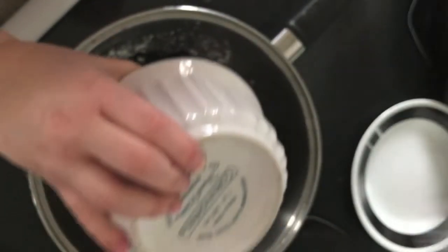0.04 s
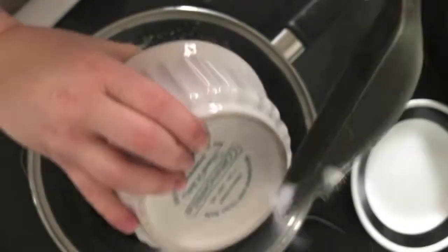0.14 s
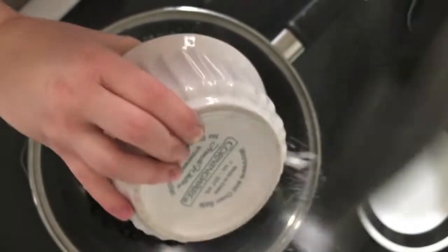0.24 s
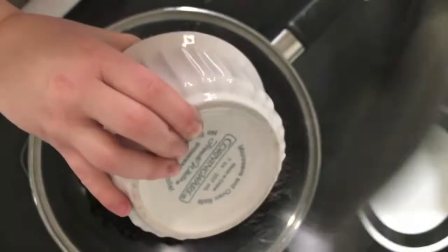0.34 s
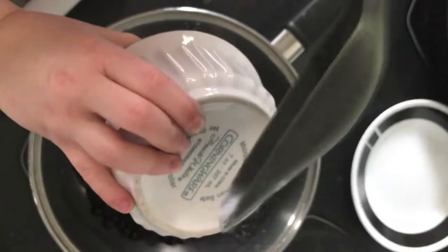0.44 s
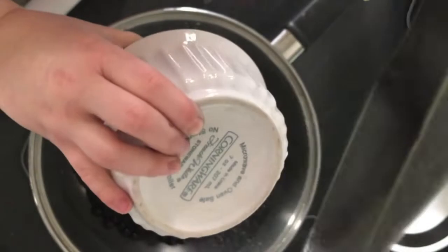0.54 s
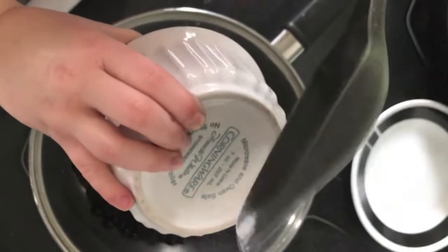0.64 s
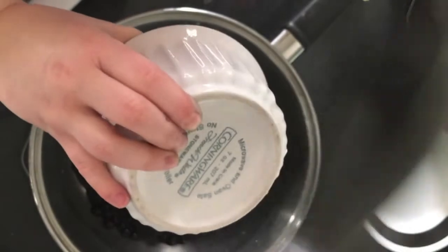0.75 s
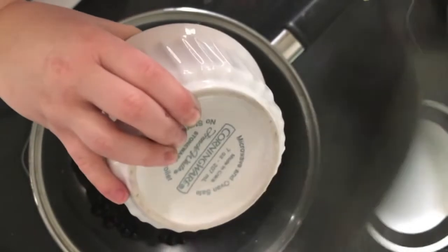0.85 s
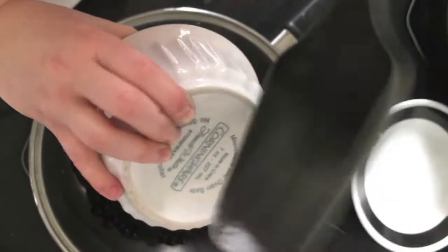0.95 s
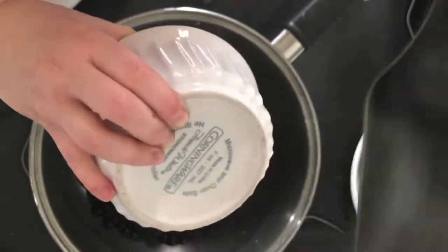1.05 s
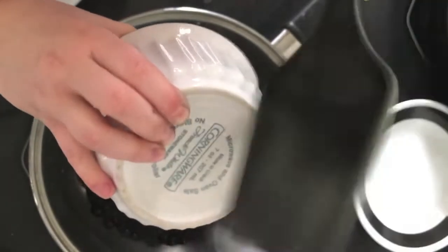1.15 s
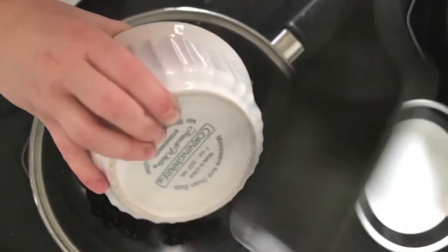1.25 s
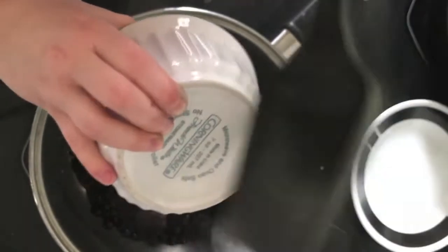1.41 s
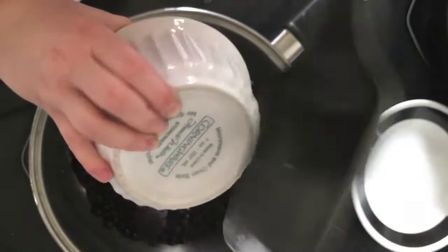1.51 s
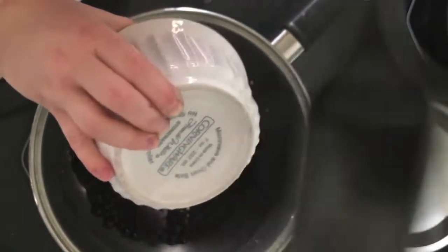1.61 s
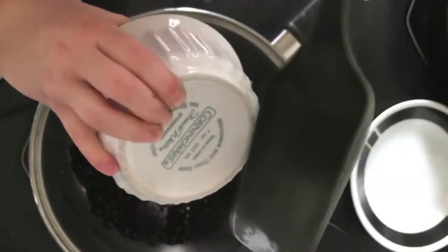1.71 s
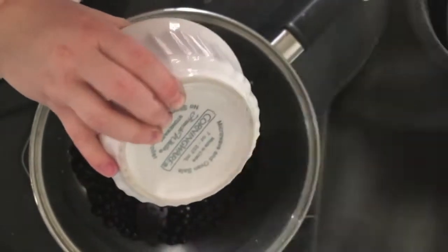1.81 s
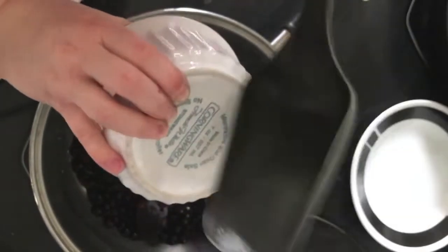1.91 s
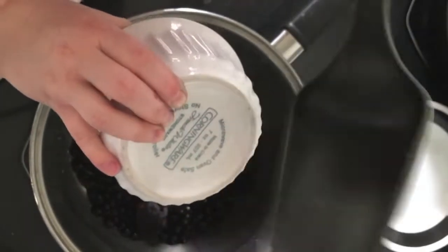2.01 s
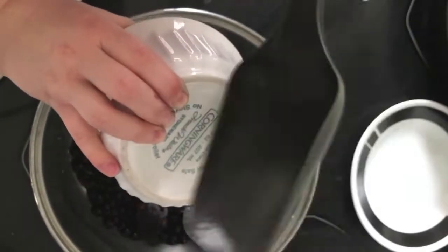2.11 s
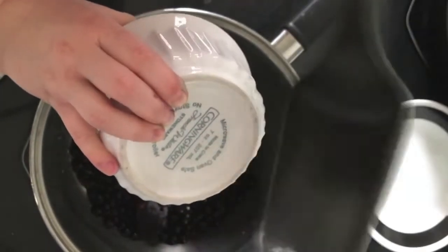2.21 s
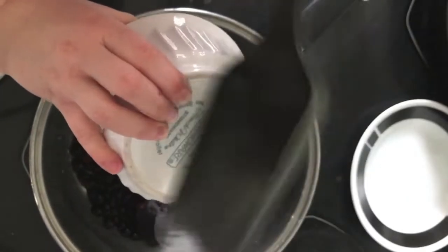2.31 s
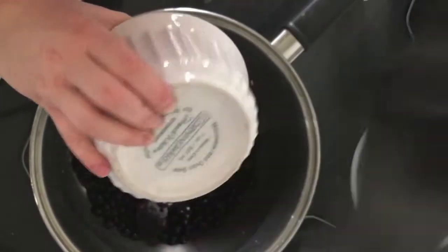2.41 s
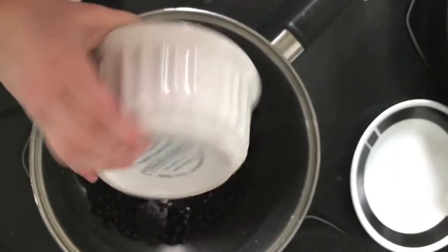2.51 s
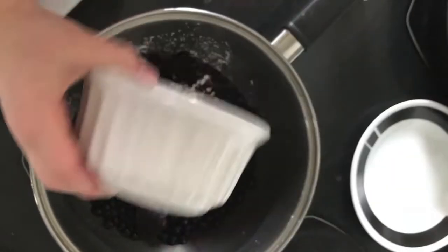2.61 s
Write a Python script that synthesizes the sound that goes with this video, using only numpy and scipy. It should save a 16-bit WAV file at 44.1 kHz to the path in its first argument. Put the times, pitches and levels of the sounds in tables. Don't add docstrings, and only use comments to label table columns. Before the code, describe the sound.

Fingernails tap the base of an upturned ceramic ramekin over a pot, about four bright knocks a second, the first loudest, some with quick bounces. Close microphone in a small kitchen, low hum and slight hiss.

```python
import sys
import numpy as np
from scipy import signal
from scipy.fft import rfft, irfft
from scipy.io import wavfile

SR = 44100
rng = np.random.default_rng(int(sys.argv[2]) if len(sys.argv) > 2 else 0)


def linear_from_db(decibels):
    return 10 ** (np.asarray(decibels, float) / 20)


def wav_record(signal):
    frames = np.transpose(np.atleast_2d(signal))
    bounded = np.clip(frames, -1, 1)
    quanta = np.round(bounded * 32767).astype(np.int16)
    wavfile.write(sys.argv[1], SR, quanta)


N = 116865

# start in seconds, peak in dB, centre of the knock in Hz, ring in dB, crack in dB.
RAPS = [(0.2174, 13, 1970, -30.5, -14.5), (.4833, 3.5, 1460, -33, -12), (.7140, 2, 1670, -34.5, -9),
        (0.9686, 0.5, 2440, -35, -6.5), (1.2246, 2.5, 2430, -36, -5), (1.4976, 1.5, 3040, -34, -4.5),
        (1.742, 4, 2920, -29, -6), (1.7779, 2, 2380, -40, -10.5), (1.959, 1, 2480, -32, -4.5),
        (2.1838, -6, 3040, -31, -3), (2.3404, -2.5, 3300, -34, -5.5)]


def rms_one(x):
    return x / np.sqrt(np.mean(x ** 2) + 1e-20)


def coloured(points):
    hz, db = np.transpose(points)
    f = np.maximum(np.fft.rfftfreq(N, 1 / SR), 1)
    octaves_below = np.maximum(np.log2(hz[0] / f), 0)
    octaves_above = np.maximum(np.log2(f / hz[-1]), 0)
    shape_db = np.interp(np.log(f), np.log(hz), db) - 24 * octaves_below - 12 * octaves_above
    return rms_one(irfft(rfft(rng.standard_normal(N)) * linear_from_db(shape_db), N))


def modes(table, gain_db, t, length=1):
    hz, db, t60 = np.transpose(table)[:, :, None]
    sign = (-1.) ** np.arange(len(hz))[:, None]
    level = linear_from_db(db + gain_db[:, None] - 60 * t / t60 / length)
    return (sign * level * np.sin(2 * np.pi * hz * t)).sum(axis=0)


def spot_gain(table, centre_hz):
    octaves = np.log2(np.array(table)[:, 0] / centre_hz)
    return -6 * (octaves / 0.7) ** 2 + 1.5 * rng.standard_normal(len(table))


def nail_contact():
    chatter_s, loss_db = 0.001346, 10
    contact = np.zeros(SR // 100)
    for k in range(3):
        gap_s = chatter_s * (1 + 0.079 * rng.standard_normal())
        lag = int(np.clip(k * gap_s * SR, 0, len(contact) - 1))
        contact[lag] += linear_from_db(-loss_db * k) * (-1) ** k
    return contact


def knock(peak_db, centre_hz, t):
    # frequency in Hz, level in dB, t60 in seconds.
    damped = [(778, -2, 0.018), (896, 5, 0.0073), (1117, 2.5, 0.0091), (1180, -1.5, 0.023),
              (1412, -0.5, 0.019), (1630, -6, 0.033), (1993, -2.5, .02), (2229, -3, 0.028),
              (2490, 1.5, 0.01), (2971, -7.5, 0.025), (3300, 7, 0.0054), (3946, 0, 0.016),
              (4500, 6.5, 0.0072), (4840, -42.5, 0.0078)]
    length = linear_from_db(0.13 * peak_db)
    body = modes(damped, -6 + spot_gain(damped, centre_hz), t, length)
    return signal.fftconvolve(body, nail_contact())[:len(t)]


def ring(ring_db, centre_hz, t):
    # frequency in Hz, level in dB, t60 in seconds.
    ringing = [(1157, -5, 0.45), (1214, 5.5, 0.14), (1320, -27, 0.24), (1710, -0.5, 0.2), (1854, -7, 0.33),
               (1966, -3.5, 0.19), (2160, -1.5, 0.24), (2380, -7, 0.21), (2430, -1, 0.128), (2820, -14, .1),
               (3100, 2, .12), (3620, -38.5, 0.079), (3740, -32.5, 0.127), (4600, -21, .1)]
    detuned = np.array(ringing)
    detuned[:, 0] *= 1 + 0.012 * rng.standard_normal(len(ringing))
    return modes(detuned, ring_db + spot_gain(ringing, centre_hz), t)


def crack(crack_db, t):
    level_db, t60_s, low_hz = 5, 0.011, 3500
    nail_hz, nail_width_hz = 7300, 2000
    burst = np.array([rng.standard_normal(len(t)), linear_from_db(13.5) * (t == 0)])
    high = signal.butter(2, low_hz, "high", fs=SR, output="sos")
    nail = signal.iirpeak(nail_hz, nail_hz / nail_width_hz, fs=SR)
    bright = signal.sosfilt(high, burst) + signal.lfilter(*nail, burst)
    return linear_from_db(level_db + crack_db - 60 * t / t60_s) * bright


def decaying_tone(hz, db, t60_s, t):
    return linear_from_db(db - 60 * t / t60_s) * np.sin(2 * np.pi * hz * t)


def pads(t):
    # start in seconds, low push in dB, rim note in dB, pot note in dB.
    presses = [(0.2181, -17, -10.5, -21), (.4833, -12, -49, -28), (0.715, -10.5, -25, -35),
               (0.9702, -14.5, -31.5, -48), (1.2245, -13, -23, -56), (1.4988, -17, -32, -48),
               (1.5310, -14, -43, -43), (1.7418, -7.5, -44, -37), (1.778, -9, -31.5, -51),
               (1.9571, -24.5, -27.5, -48), (2.1836, -47, -37, -47), (2.3418, -41, -30, -54),
               (2.3628, -40, -31.5, -50)]
    # frequency in Hz, t60 in seconds, share in dB.
    push_hz, push_t60_s, push_share_db = (157, 293, 567), (0.027, 0.011, 0.015), (0, 3.5, -1)
    out = np.zeros((2, N + SR))
    for s, push_db, rim_db, pot_db in presses:
        i = int(s * SR)
        span = slice(i, i + len(t))
        out[0, span] += decaying_tone(1894, pot_db, 0.24, t)
        out[0, span] += decaying_tone(2741, rim_db, 0.19, t)
        for hz, t60_s, share_db in zip(push_hz, push_t60_s, push_share_db):
            out[:, span] += decaying_tone(hz, push_db + share_db, t60_s, t)
    return out


def ramekin():
    # start in seconds, peak in dB, centre of the knock in Hz, ring in dB, crack in dB.
    touches = [(0.4842, -6.5, 4500, -40, -33), (1.2272, -4.5, 2380, -34, -16), (1.745, -2, 2330, -37, -9),
               (1.9610, -5.5, 4500, -44, -11), (2.3604, -9.5, 3800, -38, -13.5),
               (.7600, -19, 1670, -32, -34), (1.2523, -3, 2750, -33, -6), (1.2701, -14, 2640, -40, -3.5),
               (1.5310, -2, 2730, -32.5, -7), (1.5617, -16.5, 2500, -46, -9.5), (2.361, -6, 1490, -31, -20),
               (2.3700, -12, 1930, -34, -12)]
    t = np.arange(SR // 2) / SR
    out = pads(t)
    for s, peak_db, centre_hz, ring_db, crack_db in RAPS + touches:
        hit = knock(peak_db, centre_hz, t) + crack(crack_db, t)
        hit[0] += ring(ring_db, centre_hz, t)
        i = int(s * SR)
        out[:, i:i + len(t)] += linear_from_db(peak_db) * hit
    return out[:, :N]


def scuffs():
    # start in seconds, length in seconds, level in dB, centre in Hz.
    rubs = [
        (0.196, 0.0022, -44, 2610),
        (.194, 0.0025, -53, 6500),
        (0.201, 0.008, -43, 1790),
        (1.198, .004, -50, 4000),
        (2.391, 0.012, -33.5, 3500),
        (2.394, .010, -36, 11000),
        (2.542, 0.031, -39, 1250),
        (2.540, 0.016, -37.5, 5160),
        (2.5407, 0.0056, -30.5, 12700),
    ]
    grains_per_s, fall_db, reach = 6800, 7.5, 1.35
    out, t = np.zeros(N), np.arange(N) / SR
    grains = (rng.random(N) < grains_per_s / SR) * rng.standard_normal(N) + 1e-9
    for s, length, db, hz in rubs:
        edges = [hz / reach, min(hz * reach, .45 * SR)]
        band = signal.butter(2, edges, "band", fs=SR, output="sos")
        pressure = (t > s) * linear_from_db(-fall_db * np.clip((t - s) / length, 0, 9) ** 2)
        out += linear_from_db(db) * pressure * rms_one(signal.sosfilt(band, grains))
    return out


def kitchen(x):
    # frequency in Hz, level in dB, t60 in seconds.
    room = [(400, -25.5, 0.27), (1080, -27.5, 0.59), (1900, -39, 0.89), (4000, -24, 0.39),
            (7600, -24, 0.35), (15200, -28.5, 0.32)]
    early_db, early_t60_s, delay_s = 17, 0.061, 0.0066
    t = np.arange(SR // 2) / SR
    hz, db, t60 = np.transpose(room)
    white = rng.standard_normal((2, len(t)))
    edges = 250 * 2 ** np.arange(0, 6.6, .5)
    echo = np.zeros(len(t))
    for k, (low, high) in enumerate(zip(edges, np.minimum(edges[1:], .45 * SR))):
        log_hz = np.log(low * high) / 2
        sos = signal.butter(2, [low, high], "band", fs=SR, output="sos")
        band = signal.sosfilt(sos, white[k % 2])
        late = linear_from_db(-60 * t / np.interp(log_hz, np.log(hz), t60))
        early = linear_from_db(early_db - 60 * t / early_t60_s)
        echo += linear_from_db(np.interp(log_hz, np.log(hz), db) - 23) * band * (late + early)
    return signal.fftconvolve(x, echo * np.clip(t / delay_s, 0, 1))[:N]


def appliance():
    # frequency in Hz, rms level in dB, width in Hz.
    hum = [(143.8, -48.5, 2.7), (190.5, -47.5, 8.7), (214.6, -51.5, 15), (242.2, -41.5, 3.9),
           (303.5, -49.5, 7.1), (352, -66.5, 30)]
    # frequency in Hz, density in dB per Hz.
    rumble = [(24, -21.5), (40, -24), (80, 0.5), (135, -9), (225, 0.5), (350, -11), (586, -21), (882, -20),
              (1500, -34), (1950, -55.5), (3300, -120)]
    mains_hz, mains_db, rumble_db = 59.8, -43, -43
    t, f = np.arange(N) / SR, np.fft.fftfreq(N, 1 / SR)
    out = linear_from_db(rumble_db) * coloured(rumble)
    out += linear_from_db(mains_db) * np.sqrt(2) * np.sin(2 * np.pi * mains_hz * t)
    for hz, db, width_hz in hum:
        spectrum = np.fft.fft(rng.standard_normal(N)) / (1 + (2 * f / width_hz) ** 2)
        waver = np.fft.ifft(spectrum).real
        waver = waver / waver.std()
        drift = 1.2 * np.roll(waver, N // 2)
        tone = np.sin(2 * np.pi * (hz * t + rng.random()) + drift)
        out += linear_from_db(db) * rms_one((1.04 + .5 * waver) * tone)
    return out


def hiss():
    # frequency in Hz, density in dB per Hz.
    colour = [(410, -25), (700, -2), (984, -7), (1500, -8.5), (3370, -8), (13500, -15), (16000, -13.5)]
    level_db, shut_db, opens_s = -51.5, -9, .23
    gate_db = np.interp(np.arange(N) / SR, [opens_s, opens_s + 0.047], [shut_db, 0])
    return linear_from_db(level_db + gate_db) * coloured(colour)


def scene():
    low_cut = signal.butter(2, 200, "high", fs=SR, output="sos")
    near, far = signal.sosfilt(low_cut, ramekin() + scuffs())
    rap_starts = np.array(RAPS)[:, 0]
    pose = np.searchsorted(rap_starts, np.arange(N) / SR + .001) % 3
    echoes = sum(kitchen(far * (pose == k)) for k in range(3))
    return (near + echoes + appliance() + hiss())[None]


def low_pass(x):
    return signal.sosfilt(signal.butter(12, 16390, fs=SR, output="sos"), x)


def record(dry):
    cutoff_hz, ceiling, knee = 15900, 1.0, 8
    cut = signal.sosfilt(signal.cheby2(10, 30, cutoff_hz, fs=SR, output="sos"), dry)
    flattened = cut / (1 + np.abs(cut / ceiling) ** knee) ** (1 / knee)
    return low_pass(flattened)


dry = scene()
out = record(dry)
wav_record(out)
```